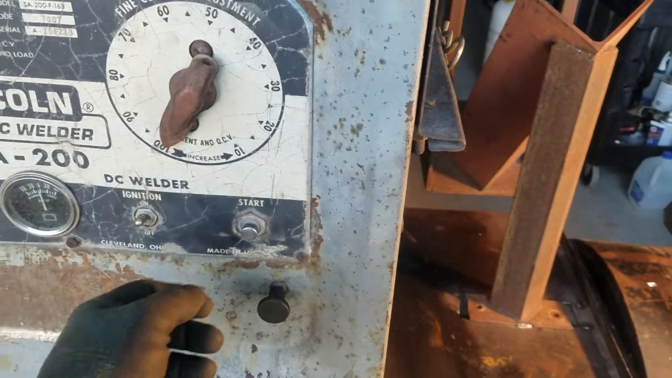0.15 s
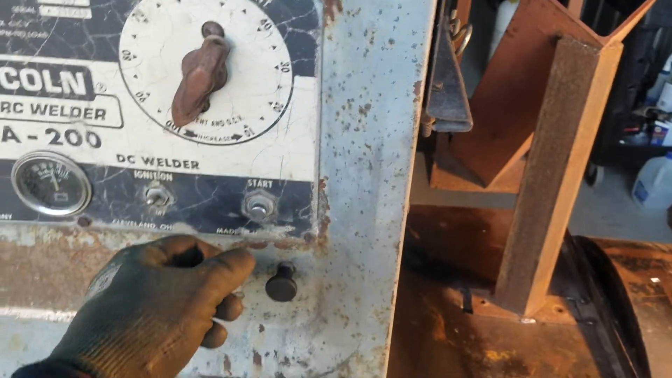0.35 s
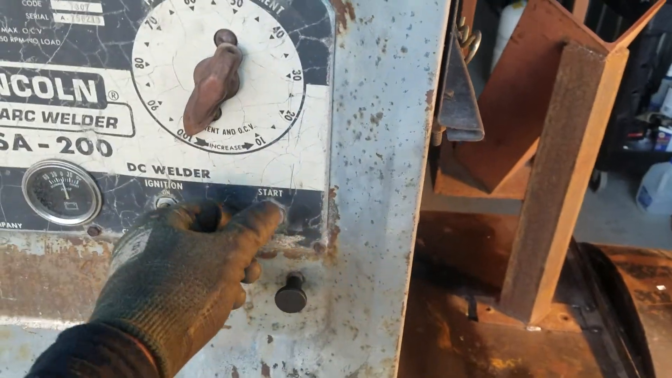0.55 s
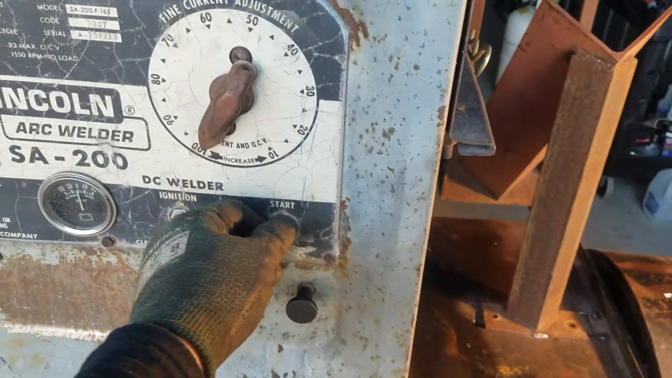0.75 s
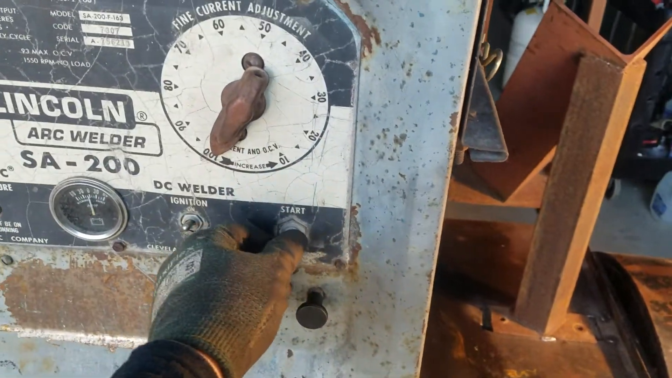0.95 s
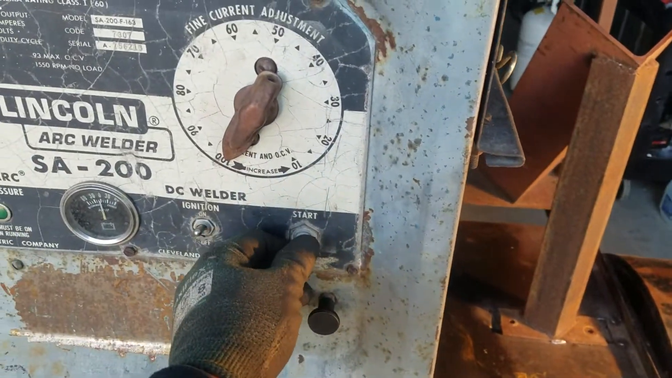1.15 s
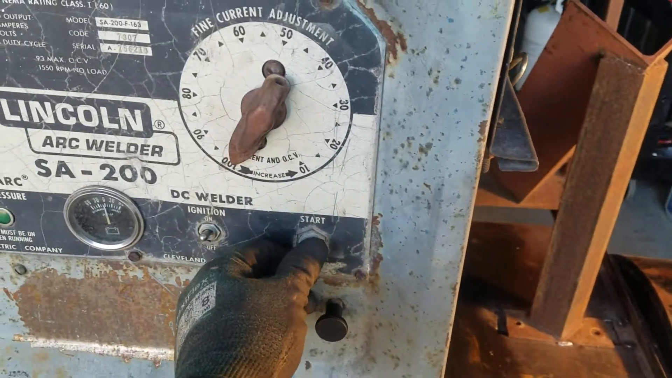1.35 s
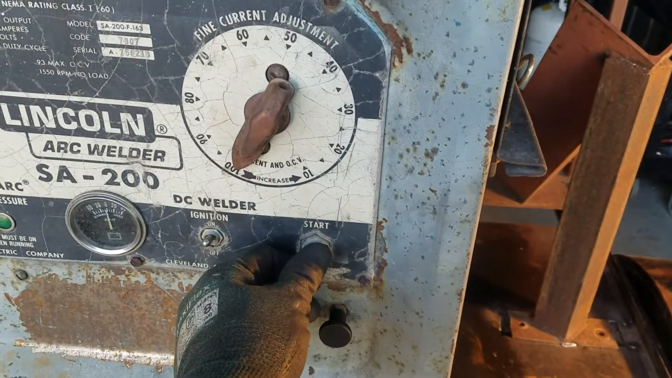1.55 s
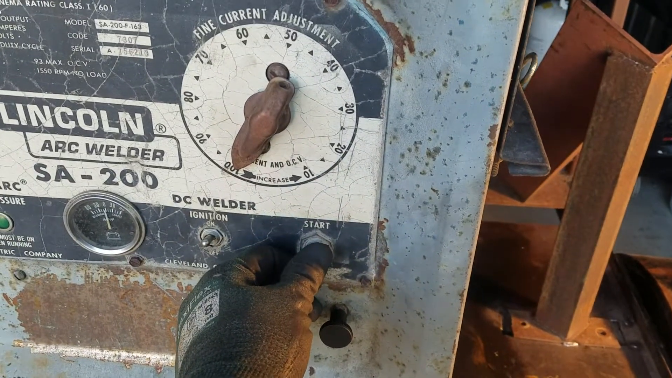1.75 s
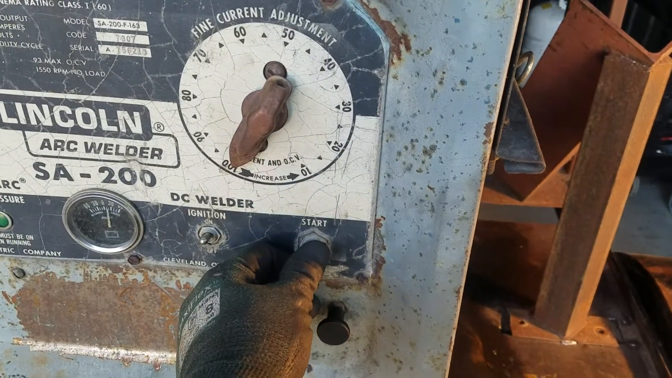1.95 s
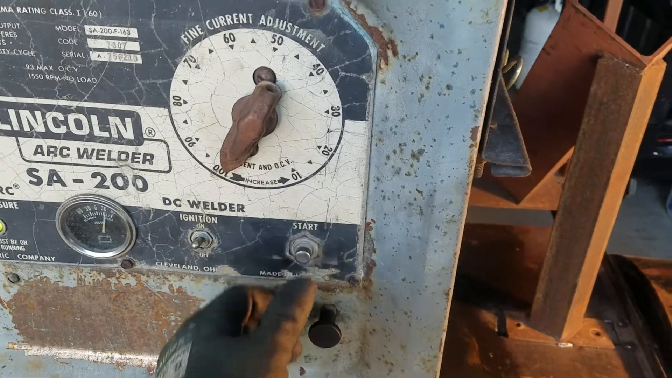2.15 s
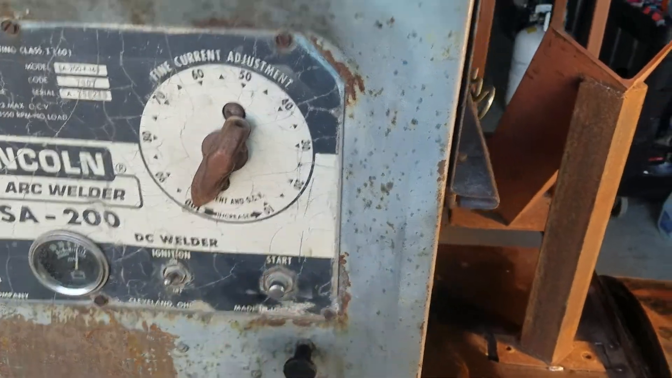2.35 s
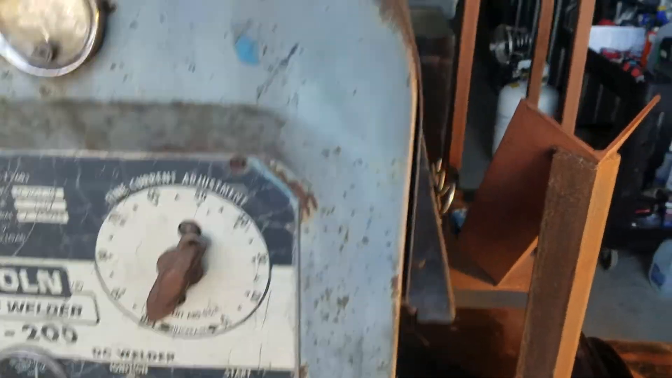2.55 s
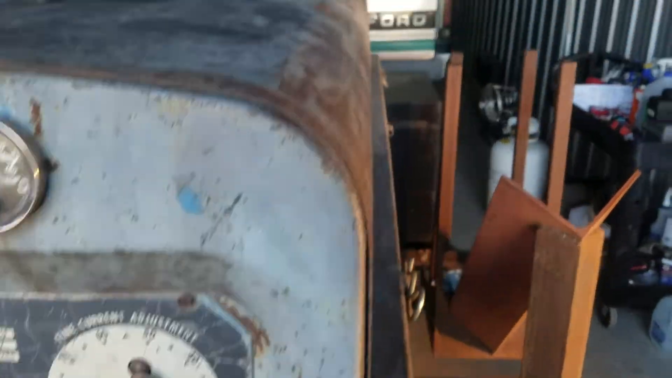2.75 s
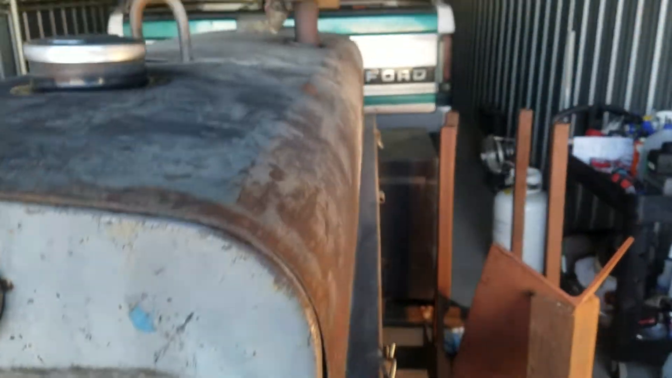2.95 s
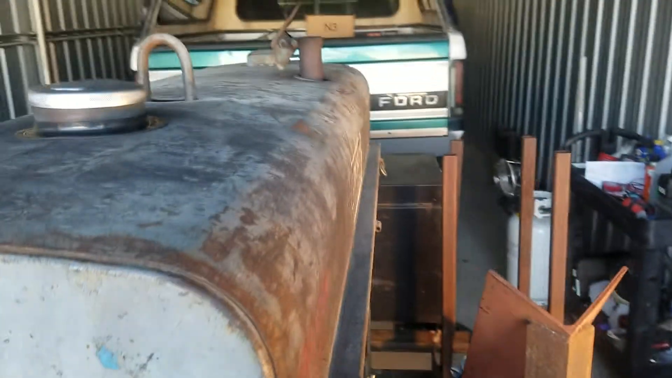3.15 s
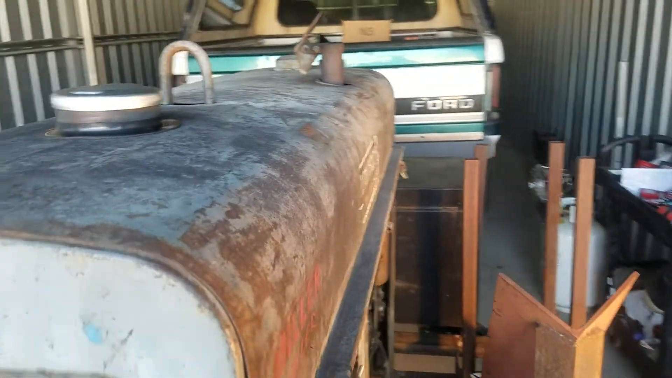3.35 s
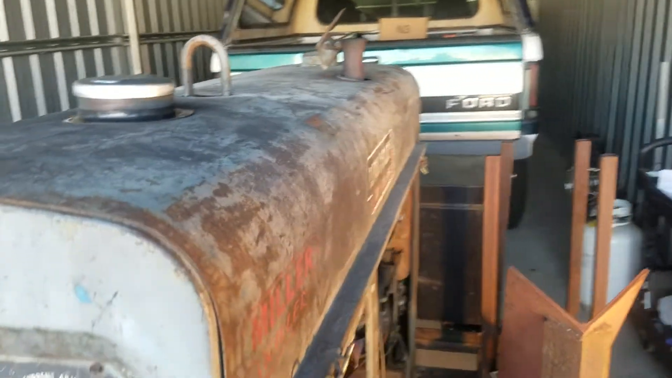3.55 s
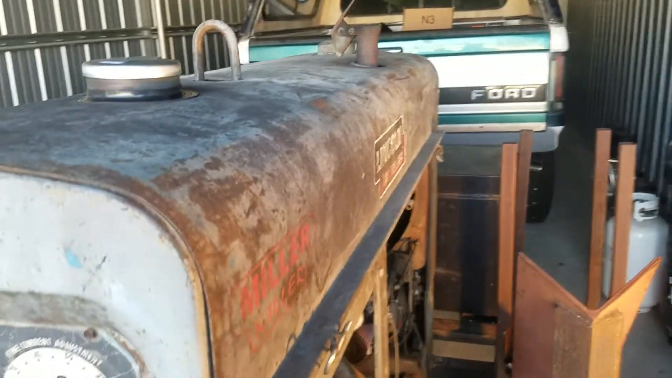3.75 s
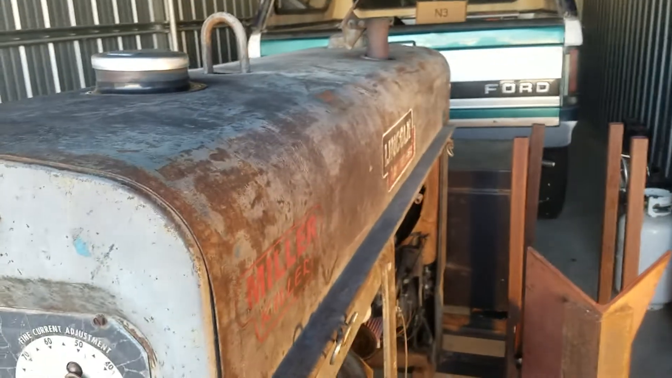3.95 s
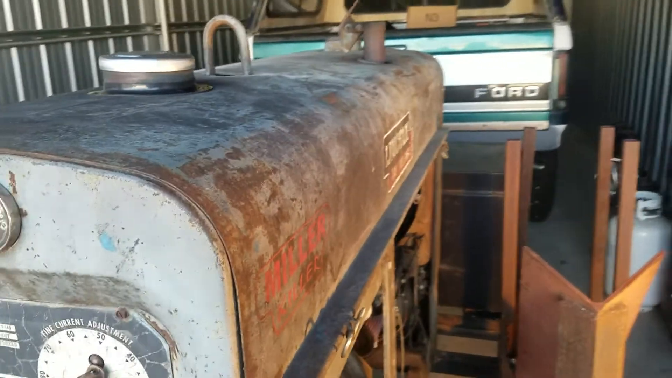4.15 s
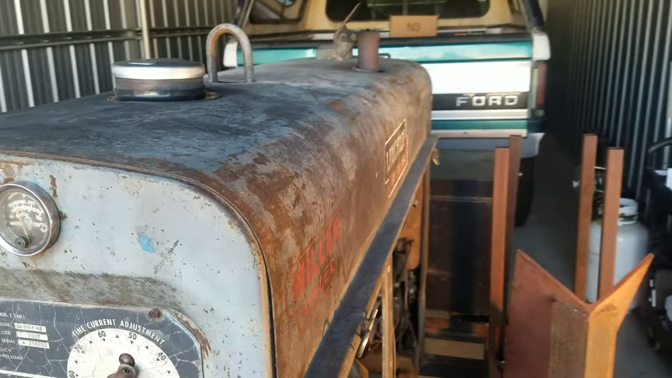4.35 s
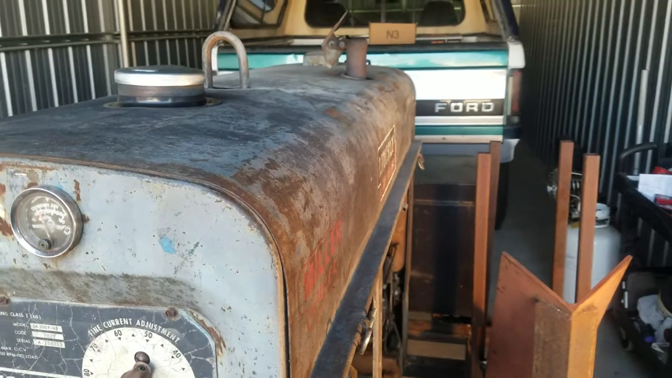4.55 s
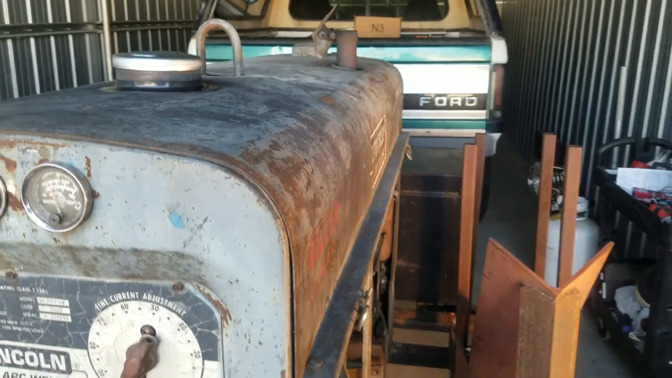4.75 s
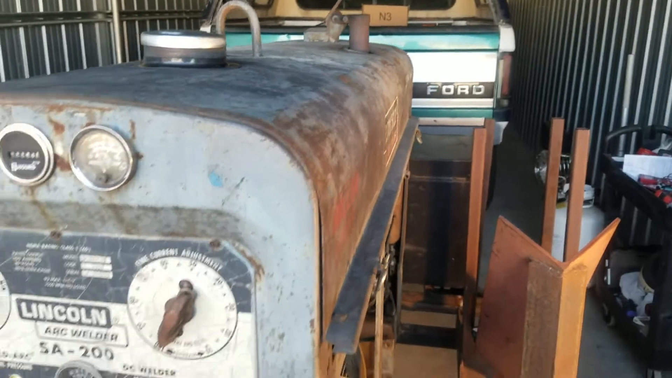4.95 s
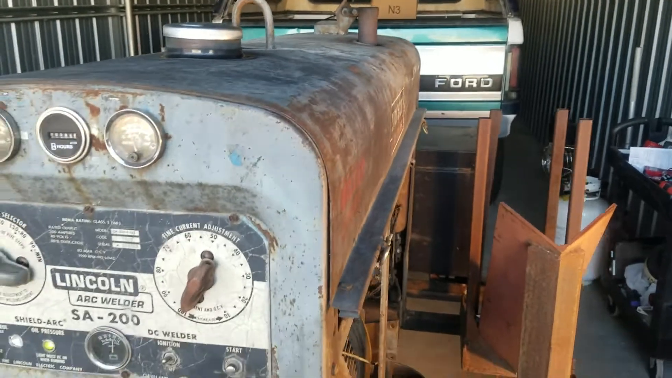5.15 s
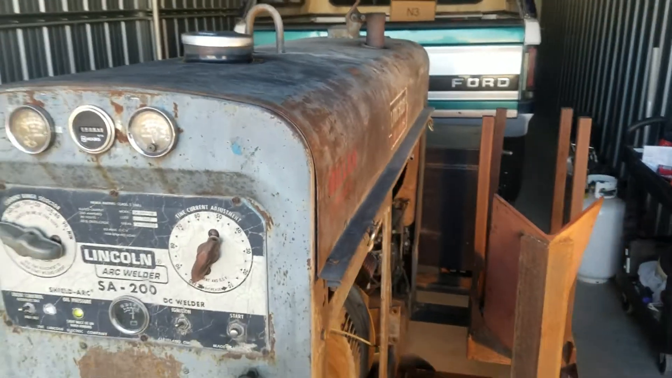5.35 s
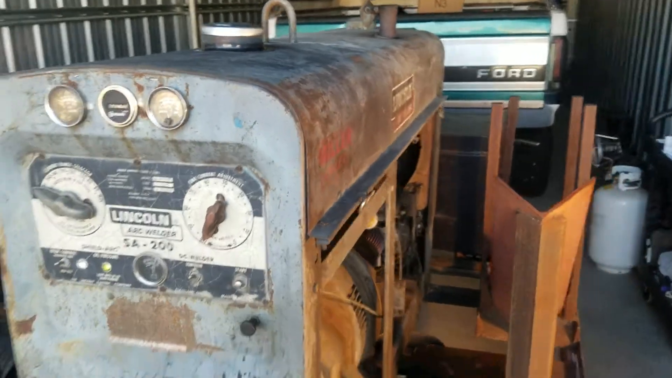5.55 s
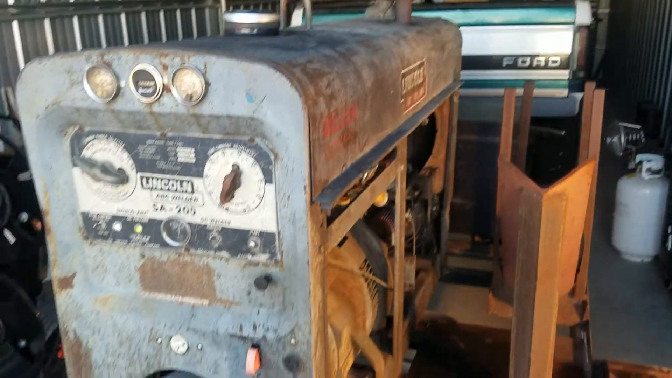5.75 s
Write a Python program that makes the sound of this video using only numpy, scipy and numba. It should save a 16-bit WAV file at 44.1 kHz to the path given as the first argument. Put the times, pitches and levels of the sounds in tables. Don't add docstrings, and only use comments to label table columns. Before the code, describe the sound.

Stereo phone at arm's length in a small tin shed with a short reverberant tail. From 0 to 1.3 s it is quiet: soft low air hush, a glove rustling and faintly squeaking on painted steel, a light knock at 0.5 s and a firmer hollow one at 0.77 s. A bright switch tick at 1.34 s, then a starter pinion slams in and grinds with low growl and bright gear whirr, dipping at each compression. Single firings thump at about 1.69, 1.80, 1.87 and 1.96 s; the starter lets go at 2.0 s. Heavy tin clatter and gas spits accompany a rapid run-up, roaring and hissing, from about 15 firings a second to a peak near 56 at 2.7 s. It eases by 3 s, hunts slightly with light rattles, and holds near 51 firings a second, a fuller low drone. Dynamo hum near 400 Hz swells in around 4.6 s and continues to the end.

```python
import sys
import numpy as np
from scipy import signal
from scipy.fft import rfft, irfft
from scipy.io import wavfile
from scipy.ndimage import uniform_filter1d
from numba import njit

SR = 44100
rng = np.random.default_rng(int(sys.argv[2]) if len(sys.argv) > 2 else 0)


def dump_mix(stems):
    frames = np.atleast_2d(stems).T
    limited = np.clip(frames, -1, 1)
    pcm = np.round(limited * 32767).astype(np.int16)
    wavfile.write(sys.argv[1], SR, pcm)


def to_linear_factor(level_db):
    exponent = np.asarray(level_db, float) / 20
    return 10 ** exponent


N = 256220
T = np.arange(N) / SR
HZ = np.maximum(np.fft.rfftfreq(N, 1 / SR), 1)

STARTER_ON_S, PINION_S, STARTER_OFF_S = 1.352, 1.3755, 2.0

# [t/s, effort level/dB, throttle 0-1]
ENGINE = [(1.7, -20.5, 0.2), (1.87, -36, 1), (2.0, -22.5, 1), (2.19, -22.5, 0.76), (2.56, -18, 0.8),
          (2.69, -17.5, 0.72), (2.8, -20, 0.54), (2.98, -19.5, 0.4), (3.05, -20, 0.22), (3.33, -19, 0.41),
          (3.41, -17.5, 0.24), (3.55, -18.5, 0.28), (4.18, -15, 0.29), (4.34, -14, 0.33),
          (5.02, -12.5, 0.26), (5.33, -13.5, 0.28), (5.74, -12.5, 0.3)]
# [f/Hz, width/Hz, level/dB]
FRAME = [(98, 10, -13.5), (169, 27, -13), (200, 20, -10), (250, 40, 1), (290, 40, -2), (330, 50, -1),
         (412, 34, -4), (620, 210, -20)]


def table(rows, at):
    hz, value = np.transpose(rows)
    return np.interp(np.log(at), np.log(hz), value)


def curves(rows):
    s, *columns = np.transpose(rows)
    return [np.interp(T, s, c) for c in columns]


def unit(x):
    return x / np.sqrt(np.mean(x ** 2))


def colour(x, rows):
    cepstrum = irfft(table(rows, HZ) * np.log(10) / 20, N)
    cepstrum[1:N // 2] *= 2
    cepstrum[N // 2 + 1:] = 0
    return irfft(rfft(x) * np.exp(rfft(cepstrum)), N)


def highpass(x, order, hz):
    return signal.sosfilt(signal.butter(order, hz, "high", fs=SR, output="sos"), x)


def noise():
    # [f/Hz, share 0-1]
    likeness = [(60, 1), (130, 0.95), (290, 0.93), (640, 0.57), (1400, 0.18), (3100, 0.41), (6800, 0),
                (15000, 0.06)]
    alike = np.clip(table(likeness, HZ), 0, 1)
    mid, side = rfft(rng.standard_normal((2, N))) * np.sqrt([1 + alike, 1 - alike])
    return unit(irfft([mid + side, mid - side], N))


@njit
def svf(x, hz, width):
    y, band, low = np.empty(len(x)), 0., 0.
    for i in range(len(x)):
        g, k = np.tan(np.pi * hz[i] / SR), width / hz[i]
        v = (band + g * (x[i] - low)) / (1 + g * (g + k))
        band, low, y[i] = 2 * v - band, low + 2 * g * v, k * v
    return y


def ring(pair, hz, width):
    return np.array([svf(x, hz + 0 * T, 1. * width) for x in pair]) * np.sqrt(SR / np.pi / width)


def ring_twice(pair, hz, width):
    return ring(ring(pair, hz, width), hz, width)


def walk(rate):
    k = int(SR / rate)
    steps = np.repeat(rng.standard_normal(N // k + 1), k)
    return 1.33 * uniform_filter1d(uniform_filter1d(steps, k), k)[:N]


def shed(x, t60, wet_db):
    t = T[:SR // 2]
    tail = noise()[:, :len(t)] * np.exp(-np.log(1000) * t / t60) * (t > .004)
    tail = tail / np.sqrt(np.sum(tail ** 2) / 2)
    return x + to_linear_factor(wet_db) * signal.fftconvolve(x + np.zeros((2, 1)), tail, axes=1)[:, :N]


def air():
    # [f/Hz, level/dB]
    air_colour = [(18, -42), (30, -8), (90, 4), (335, -3.5), (1310, -16), (1570, -15), (2210, -12),
                  (2460, -28), (2730, -15), (3360, -37), (9860, -36), (13900, -27), (15800, -38)]
    level_db = -62 - 8 * np.exp(-((T - 0.62) / 0.13) ** 2)
    return unit(colour(noise(), air_colour)) * to_linear_factor(level_db + 0.89 * walk(7.3))


def glove():
    # [t/s, level/dB]
    rustle = [(0.0, -58.5), (0.188, -68.5), (0.348, -69.5), (0.5, -83), (0.776, -74.5), (0.948, -76),
              (1.166, -86), (1.25, -83), (1.27, -70), (1.32, -70), (1.34, -55.5)]
    # [f/Hz, level/dB]
    glove_colour = [(240, -55), (400, -23), (502, 2.5), (550, -7), (828, -9), (1350, -14), (1740, -9),
                    (2220, -12), (2620, -8), (5030, -20), (9660, -25), (10700, -18), (15000, -32)]
    # [from t/s, to t/s, f/Hz, width/Hz, level/dB]
    squeaks = [
        (0.0, .42, 3300, 1800, -80),
        (1.25, 1.34, 10600, 1200, -70),
        (.05, .4, 1720, 90, -64),
        (.35, .95, 2700, 60, -81),
        (.47, .54, 7540, 150, -72),
        (1.0, 1.328, 540, 61, -68),
        (1.0, 1.324, 1700, 120, -73),
    ]
    rub = noise() * to_linear_factor(1.9 * walk(62))
    out = unit(colour(rub, glove_colour)) * to_linear_factor(curves(rustle)[0] + 5)
    for t0, t1, hz, width, db in squeaks:
        swell = np.sqrt(np.sin(np.pi * np.clip((T - t0) / (t1 - t0), 0, 1)) + 1e-9)
        out = out + to_linear_factor(db) * swell * ring(rub, hz, width)
    return out


def hand():
    # [t/s, peak level/dB, push/s, ring share]
    knocks = [
        (.507, -30, .008, .4),
        (.768, -24, .022, .9),
    ]
    # [t/s, peak level/dB, f/Hz, decay/s]
    ticks = [
        (.105, -51.5, 8100, .012),
        (.3, -64, 11000, .008),
        (.745, -66, 2600, .008),
        (1.18, -60, 11000, .006),
        (1.198, -55, 11000, .006),
        (1.338, -42, 4700, 0.0054),
        (1.339, -39, 10900, 0.0036),
    ]
    # [f/Hz, level/dB, t60/s]
    panel = [(127, -9, .25), (218, 2, .28), (299, -3, 0.12), (386, -8, 0.22), (520, -16, .2),
             (727, -18, .15), (970, -23, 0.079)]
    out, grit = np.zeros((2, N)), noise()
    dull = unit(ring_twice(grit, 470.0, 900))
    low = unit(ring_twice(grit, 210.0, 280))
    for s, db, push_s, share in knocks:
        t = np.maximum(T - s, 0)
        modes = 0
        for hz, mode_db, t60 in panel:
            modes = modes + to_linear_factor(mode_db) * np.sin(2 * np.pi * hz * t) * np.exp(-np.log(1000) * t / t60)
        thud = dull * np.exp(-t / push_s) + share * low * np.exp(-t / (5 * push_s))
        soft_start = 1 - np.exp(-(t / 0.0021) ** 2)
        out += to_linear_factor(db - 5.5) * (share * modes * np.exp(-t / push_s) + to_linear_factor(-17.0) * thud) * soft_start
    out = signal.sosfilt(signal.butter(4, [110, 1300], "band", fs=SR, output="sos"), out)
    for s, db, hz, decay_s in ticks:
        t = np.maximum(T - s, 0)
        out += to_linear_factor(db) * (T > s) * np.exp(-t / decay_s) * unit(ring_twice(grit, hz, hz / 2))
    return shed(out, 0.31, -11)


def frame_growl(teeth, on):
    growl = 0
    for hz, width, db in FRAME:
        build = np.minimum(on / 0.079, 1) if hz < 220 else 1
        growl = growl + to_linear_factor(db) * build * ring(teeth, hz * (1 + 0.0074 * walk(8.3)), width)
    return unit(highpass(growl, 2, 90))


def bell_housing(mesh):
    # [f/Hz, width/Hz, level/dB, loudest at t/s, lasts/s]
    modes = [(2330, 60, -1, 1.41, .05), (2330, 35, -4, 1.55, .14), (2350, 80, -3, 1.885, .02),
             (2350, 80, -6, 1.75, .012), (2800, 90, -9, 1.77, .03), (2030, 80, -6, 1.42, .05),
             (1350, 20, -5, 1.565, .045), (1350, 60, -12, 1.42, .08), (3080, 120, -7, 1.5, .03),
             (3080, 100, -6, 1.595, .012), (4060, 200, -6, 1.49, .04), (4060, 200, -5, 1.61, .04),
             (4060, 200, -5, 1.71, .03), (2720, 140, -3, 1.72, .04), (3000, 100, -4, 1.905, .02)]
    out = 0
    for hz, width, db, s, lasts in modes:
        phase = 2 * np.pi * np.cumsum(hz + .25 * width * walk(30)) / SR
        tone = np.sin(phase) * to_linear_factor(2 * walk(50))
        out = out + to_linear_factor(db) * np.exp(-((T - s) / lasts) ** 2) * (tone + 0.83 * unit(ring(mesh, hz, width)))
    return out


def gear_flares(teeth):
    # [f/Hz, width/Hz, level/dB, starts t/s, fades/s]
    flares = [
        (10500, 1600, -7, 1.37, .06),
        (13500, 4500, -7, 1.544, .025),
        (7000, 1800, -1, 1.61, 0.044),
        (10900, 1800, 2, 1.69, 0.096),
        (7000, 2000, -3, 1.69, 0.055),
        (6900, 1700, 2, 1.866, .05),
        (10800, 1800, 4, 1.885, .05),
    ]
    out = 0
    for hz, width, db, s, fades in flares:
        since = np.abs(T - s)
        shape = (T > s) * (1 - np.exp(-since / 0.0067)) * np.exp(-since / fades)
        out = out + to_linear_factor(db) * shape * unit(ring_twice(teeth, hz, width))
    return out


def pinion_slam():
    since = np.maximum(T - PINION_S, 0)
    modes = sum(to_linear_factor(db) * np.sin(2 * np.pi * hz * since) for hz, width, db in FRAME[3:])
    fade = np.exp(-since / .08) + 0.76 * np.exp(-since / 0.0052)
    return to_linear_factor(-15) * highpass(modes * fade * (1 - np.exp(-since / 0.0023)), 3, 170)


def starter():
    # [top at t/s, drop/dB, climb/s]
    compressions = [
        (1.55, 4, 0.11),
        (1.682, 7.5, 0.035),
        (1.775, 6.5, 0.043),
        (1.864, 7, 0.012),
    ]
    # [f/Hz, level/dB]
    whirr_colour = [(350, 1), (600, -20), (821, 4), (1140, -2), (2170, 1), (2380, 2), (3260, 2), (4060, 0),
                    (5560, -2), (7110, 2.5), (9220, -11), (11200, 3), (13200, -14), (14900, -8),
                    (15800, -18)]
    on = np.maximum(T - STARTER_ON_S, 0)
    off = np.maximum(T - STARTER_OFF_S, 0)
    inrush = np.exp(-on / 0.16)
    labour_db = 0
    for s, db, climb_s in compressions:
        labour_db = labour_db + db * np.exp(-np.abs(T - s) / np.where(T < s, climb_s, 0.0063))
    growl_db = -25 + 11.5 * inrush - 0.55 * labour_db - 1.5 * (T < PINION_S)
    whirr_db = -19.5 + 3 * inrush - labour_db
    teeth = noise() * to_linear_factor(2.0 * walk(160))
    mesh = noise() * to_linear_factor(1.4 * walk(220))
    grind = unit(colour(mesh, whirr_colour))
    mids = signal.sosfilt(signal.butter(1, 2200, fs=SR, output="sos"), grind)
    unload = to_linear_factor(np.interp(T, (1.84, 1.9), [0, -5]))
    whirr = to_linear_factor(-1.5) * (grind - mids * (1 - unload)) + to_linear_factor(-3.5) * bell_housing(mesh) + gear_flares(teeth)
    growl = frame_growl(teeth, on) * to_linear_factor(growl_db) * np.exp(-off / .1)
    engaged = np.minimum(on / 0.022, 1) ** 2 * np.exp(-off / 0.36)
    return pinion_slam() + engaged * (growl + whirr * to_linear_factor(whirr_db))


def crank():
    catches = [
        1.687,
        1.798,
        1.866,
        1.957,
    ]
    # [t/s, firings a second]
    speed = [(1.957, 15.02), (2.2, 27.0), (2.4, 38.37), (2.55, 44.05), (2.72, 56.1), (2.95, 51.32),
             (3.15, 48.84), (3.45, 52.79), (3.9, 50.22), (4.3, 52.45), (4.85, 50.5), (5.2, 51.94),
             (5.82, 51.16)]
    running = np.cumsum(curves(speed)[0] * (T > catches[-1])) / SR
    return uniform_filter1d(np.interp(T, catches, np.arange(len(catches))) + running, SR // 100)


def tin_blows():
    # [t/s, peak level/dB, low ring f/Hz, high ring f/Hz]
    single = [(1.6853, -14.5, 1463, 3960), (1.7973, -11.5, 1480, 2600), (1.8673, -25, 1490, 2340),
              (1.954, -5.5, 1598, 2492), (2.0163, -5.5, 1960, 2725), (2.068, -5, 2080, 2074),
              (2.1128, 4, 2156, 2145), (2.157, -2.5, 1990, 2250), (2.1945, -5.5, 990, 3200),
              (2.23, -7, 1640, 2330), (2.262, -4, 965, 4010), (2.2934, -3.5, 960, 2900),
              (2.3278, -5, 1670, 3340), (2.355, -8, 1640, 2240), (2.381, -0.5, 1370, 3560),
              (2.4114, -0.5, 1896, 2380), (2.9686, -8, 2110, 2470), (4.3021, -4, 1944, 2145)]
    # [t/s, peak level/dB, low ring f/Hz, high ring f/Hz]
    bucks = [(2.4334, -10, 2110, 2170), (2.4588, -9, 1900, 3820), (2.4825, -8, 1945, 3120),
             (2.5074, -6, 1910, 2480), (2.5286, -7, 1910, 3300), (2.5506, -9.5, 2120, 2440),
             (2.575, -3.5, 1460, 2900), (2.596, -8.5, 2100, 2390), (2.6141, -5, 1860, 3290),
             (2.6357, -11, 1710, 3870), (2.6564, -5, 1920, 3100), (2.6748, -1, 1840, 2430),
             (2.6951, -11, 1735, 2380), (2.7117, -3, 2225, 2410), (2.729, -4.5, 1780, 2770),
             (2.7474, -8.5, 1780, 2890), (2.7784, -14, 2080, 2220), (2.8154, -16, 1760, 2310),
             (2.835, -12, 2100, 2750), (2.854, -12.5, 1330, 2400), (2.8716, -12, 1860, 2400),
             (2.9303, -16, 1840, 2390), (3.0884, -12.5, 2030, 2840), (3.1083, -12, 2020, 2380),
             (3.1677, -12, 1960, 2170), (3.1947, -14, 1320, 2200), (3.2151, -8, 1950, 2230),
             (3.234, -7, 1704, 2400), (3.2555, -9, 2070, 2250), (3.274, -10, 2110, 2370),
             (3.2934, -8.5, 2100, 2170), (3.3164, -8, 2020, 2330), (3.3333, -13, 2000, 2330),
             (3.3517, -9.5, 1330, 2380), (3.3717, -10.5, 2030, 2690)]
    # [from t/s, to t/s, peak level/dB, low ring f/Hz, high ring f/Hz]
    rattles = [
        (3.4, 4.28, -20, 2050, 2500),
        (4.35, 5.66, -17.5, 1950, 2798),
    ]
    fired_s = T[np.flatnonzero(np.diff(crank().astype(int)))] - .0015
    chance = rng.standard_normal((200, 3))
    blows = single + [(s, db + 3.5, *hz) for s, db, *hz in bucks]
    for t0, t1, db, low_hz, high_hz in rattles:
        for s, (a, b, c) in zip(fired_s, chance):
            if t0 < s <= t1:
                blows.append((s, db + 4 * a, low_hz * 2 ** (.15 * b), high_hz * 2 ** (.15 * c)))
    return blows


def clatter():
    # [t/s, peak level/dB]
    spits = [(1.5439, -18), (1.6874, -25), (1.7194, -26), (1.8726, -17), (1.8954, -17), (1.956, -16),
             (2.0168, -6), (2.0677, -7), (2.1131, -16), (2.1535, -4), (2.1954, -24), (2.2283, -19),
             (2.2623, -31), (2.2932, -7), (2.3251, -5), (2.3535, -14), (2.3795, -15), (2.4064, -3),
             (2.4324, -25), (2.4578, -16), (2.4828, -19), (2.5042, -1), (2.5294, -21), (2.5504, -21),
             (2.5731, -17), (2.592, -11), (2.614, -18), (2.6354, -22), (2.6544, -17), (2.6744, -21),
             (2.6954, -23), (2.7302, -23), (2.7472, -19), (2.9337, -20), (3.1752, -25), (3.2146, -15),
             (3.235, -25), (3.255, -27), (3.2735, -22), (3.2939, -11), (3.3144, -21), (3.3338, -16),
             (3.3518, -23), (3.3712, -23)]
    # [f/Hz, level/dB]
    stroke = [(500, -30), (900, -8), (1500, -4), (2200, -2), (3300, 0), (4200, -3), (5500, -12),
              (8000, -24)]
    out = np.zeros((2, N))
    bright = unit(ring(noise(), 14800.0, 6000))
    wide = unit(colour(noise(), stroke))
    chatter = unit(ring(noise(), 110.0, 280))
    t = T[:SR // 8]
    rise = 1 - np.exp(-t / .0012)
    for s, db, low_hz, high_hz in tin_blows():
        now = slice(int(s * SR), int(s * SR) + len(t))
        ring_s = np.interp(s, [1.85, 2.1, 2.2, 3.4, 4.3], [.03, .013, .007, .007, .016])
        start = 2 * np.pi * rng.random((2, 2, 1))
        tin = sum(np.sin(2 * np.pi * hz * t + p) for hz, p in zip((low_hz, high_hz), start))
        tin = tin * (1 + .7 * chatter[:, now])
        shade = (s < 4) * to_linear_factor(-6.0 * (s > 2.76))
        rough = 0.92 * wide[:, now] * np.exp(-t / 0.0054) * shade
        out[:, now] += to_linear_factor(db - 7.5) * rise * (tin * np.exp(-t / ring_s) + rough)
    for s, db in spits:
        now = slice(int(s * SR), int(s * SR) + len(t))
        out[:, now] += to_linear_factor(db - 1) * rise * np.exp(-t / .003) * bright[:, now]
    return shed(out, .25, -11)


def exhaust_note(turn, rate):
    # [f/Hz, level/dB]
    pipe = [(40, -70), (52, -26), (82, -8.5), (103, 1.5), (130, -4), (155, -19.5), (180, -17), (206, -4.5),
            (258, -25), (310, -22), (360, -22), (410, -36), (520, -18), (700, -27.5), (1000, -58.5)]
    # [f/Hz, level/dB]
    open_throttle = [(60, -37), (110, -11), (140, 13), (170, 14), (200, 18), (260, -17), (400, -31)]
    # [t/s, share]
    racing_share = [(2.1, 0), (2.3, 0.074), (2.4, 0.039), (2.52, 0.45), (2.64, 0.47), (2.75, .1),
                    (2.83, 0.89), (3.0, 0.35), (3.1, 0.22)]
    # [t/s, level/dB]
    standing = [(1.9, 0), (2.03, -8), (2.08, 4), (2.13, -3), (2.3, -4), (2.37, -8), (2.55, -8), (2.65, -4),
                (2.70, -12), (2.745, -1), (2.795, -11), (2.85, -6), (2.93, -8), (3.02, -4), (3.17, -5),
                (3.21, -2), (3.6, -2), (4.2, 0), (4.75, -3.5), (5.25, -2), (5.8, -8)]
    cylinders = [0, -.8, .3, -.5]
    effort_db, throttle = curves(ENGINE)
    firing = turn.astype(int)
    fired = np.diff(firing, prepend=0)
    scatter_db = (.4 + 3.5 * throttle ** 2) * rng.standard_normal(200)[firing]
    pulses = fired * to_linear_factor(scatter_db + np.take(cylinders, firing % 4)) / np.sqrt(rate)
    pulses = np.roll(pulses, int(.0062 * SR))
    racing = curves(racing_share)[0] * unit(colour(pulses, open_throttle))
    return (unit(colour(pulses, pipe)) + racing) * to_linear_factor(effort_db + curves(standing)[0])


def gases(turn, rate):
    # [f/Hz, level/dB]
    rumble_colour = [(90, -25.5), (125, -3.5), (170, -6), (206, -7), (250, -4), (300, -9), (500, -9.5),
                     (750, -15), (1000, -11), (1160, -17.5), (1400, -13.5), (1900, -23), (3000, -78.5)]
    sub_colour = [(20, -19), (30, 0), (50, -1.5), (75, 1), (100, 6), (130, -25)]
    bark_colour = [(470, -43), (800, -9), (976, -0.5), (1160, -14), (1340, -4), (1930, 3.5), (2590, 2),
                   (3410, -3.5), (5000, -15), (6500, -35), (11000, -120)]
    hiss_colour = [(2060, -18), (3500, 2), (4070, -2.5), (4940, -5), (7160, 1), (8980, -11), (10800, 1.5),
                   (11300, -2), (12100, -10), (14100, -9), (15000, -12), (15800, -13)]
    # [f/Hz, width/Hz, level/dB]
    hood_modes = [(270, 18, -4), (360, 14, -5), (407, 14, -2), (538, 25, -4), (615, 25, -4)]
    effort_db, throttle = curves(ENGINE)
    snap = np.clip(.15 + .8 * throttle, 0, .97)
    firing = turn.astype(int)
    since = T - np.maximum.accumulate(T * np.diff(firing, prepend=0))
    chance = rng.standard_normal((4, 200))

    def puff(share, rise_s, scatter_db, draw):
        shape = (1 - np.exp(-since / rise_s)) * np.exp(-since * rate / share) / np.sqrt(share / 2)
        shape = np.roll(shape, -int(.004 * SR))
        return np.sqrt(1 - snap ** 2) + snap * shape * to_linear_factor(scatter_db * draw[firing])

    shake = noise() * puff(0.51, 0.007, 4.9, chance[0])
    hood = sum(to_linear_factor(db) * unit(ring(shake, hz, width)) for hz, width, db in hood_modes)
    rumble = (unit(colour(shake, rumble_colour)) + to_linear_factor(-14.0) * hood) * to_linear_factor(effort_db - 4.5)
    sub = unit(colour(noise(), sub_colour)) * to_linear_factor(effort_db - 18.0)
    gas = noise() * puff(.28, .002, 1.5, chance[1])
    throat_hz = np.clip(2200 * 2 ** (0.39 * chance[2][firing]), 1000, 3400)
    bark = unit(colour(gas, bark_colour)) + to_linear_factor(-10) * unit(ring(gas, throat_hz, 330))
    bark = unit(bark) * to_linear_factor(effort_db - 15 + 20.5 * throttle - 1.0)
    jet = noise() * puff(0.53, 0.0017, 5.2 * throttle, chance[3])
    hiss_db = effort_db - 24 + 26 * throttle
    hiss = unit(colour(jet, hiss_colour)) * to_linear_factor(hiss_db + 1.5 + 1.17 * walk(12))
    return rumble + sub + hiss + bark


def dynamo(turn):
    level_db = -28.5 + 4.5 - 23 * np.maximum(4.65 - T, 0) + 1.9 * walk(8.6)
    return to_linear_factor(level_db) * np.sin(2 * np.pi * 7.91 * turn)


def engine():
    turn = crank()
    rate = np.maximum(np.gradient(turn) * SR, 8)
    out = exhaust_note(turn, rate) + dynamo(turn) + shed(gases(turn, rate), 0.32, -13.0)
    return out * np.clip((T - 1.68) / 0.024, 0, 1)


def scene():
    return air() + glove() + hand() + starter() + clatter() + engine()


def low_pass(x):
    return signal.sosfilt(signal.butter(12, 16640, fs=SR, output="sos"), x)


def record(dry):
    # [f/Hz, left minus right level/dB]
    port_colour = [(100, -3), (250, -3), (900, -3), (2300, -9), (4500, -11), (7200, -12), (8000, 1.5),
                   (9500, 12), (10800, 13.5), (12000, 11), (13200, -2), (14200, -6), (15500, -4)]
    dry = dry + to_linear_factor(-77) * noise()
    long_waves = np.clip(np.log2(HZ / 100), .1, 1)
    share = to_linear_factor(table(port_colour, HZ) * long_waves)
    ports = np.sqrt(2 / (1 + share ** 2)) * np.array([share, 1 + 0 * share])
    taps = np.roll(irfft(ports, N), 512, axis=1)[:, :1025] * np.hanning(1025)
    x = highpass(signal.fftconvolve(dry, taps, mode="same", axes=1), 2, 60)
    rounded = np.tanh(1.08 * x) / 1.08
    mix = signal.sosfilt(signal.ellip(10, .2, 70, 15850, fs=SR, output="sos"), rounded)
    return low_pass(mix)


dry = scene()
out = record(dry)
dump_mix(out)
```